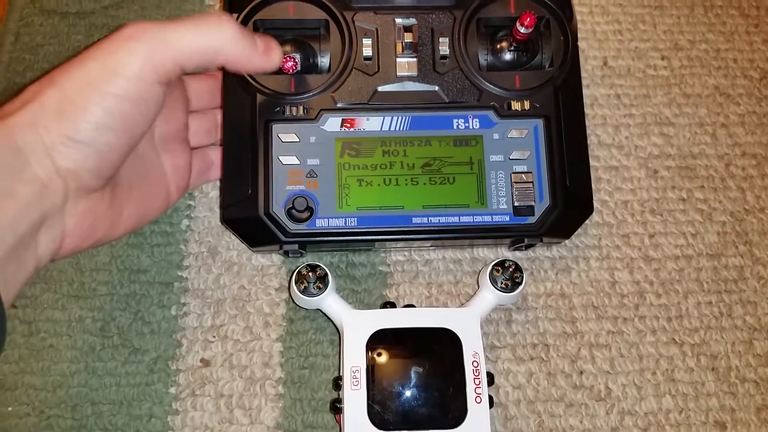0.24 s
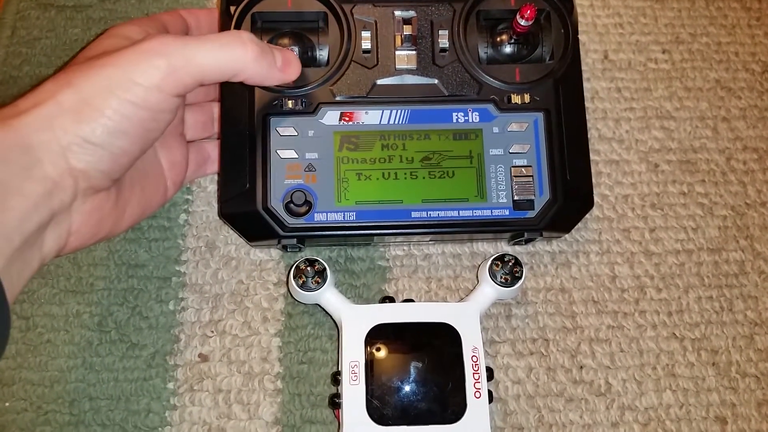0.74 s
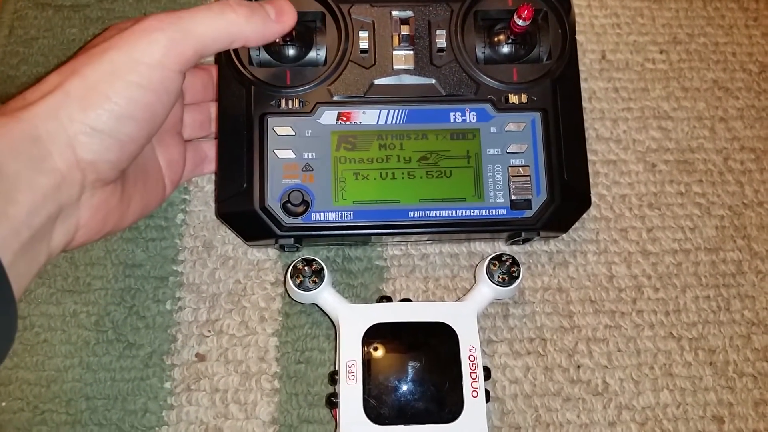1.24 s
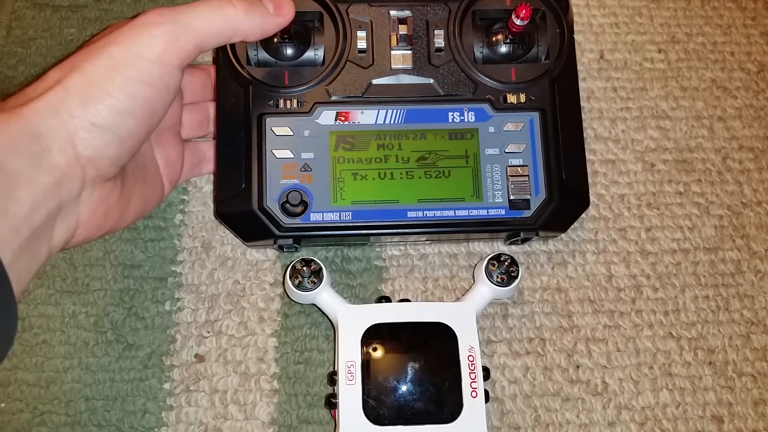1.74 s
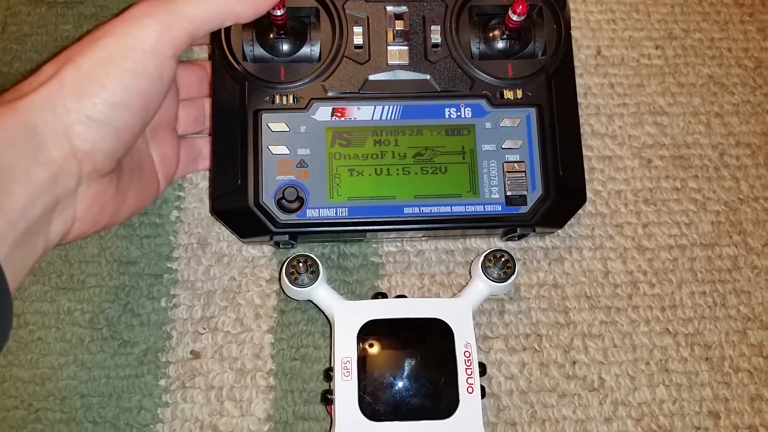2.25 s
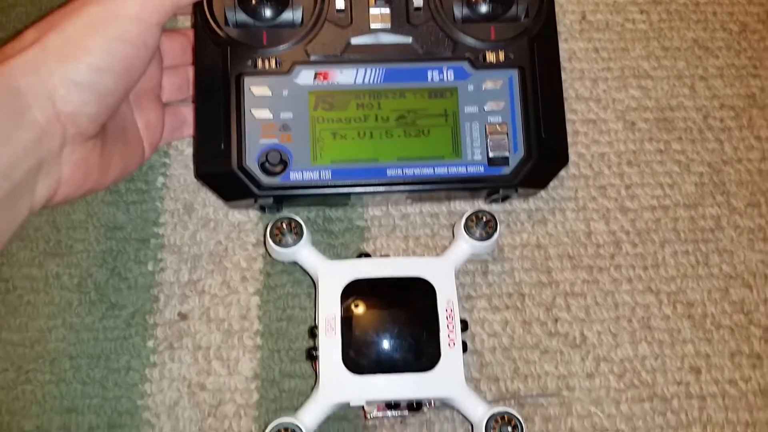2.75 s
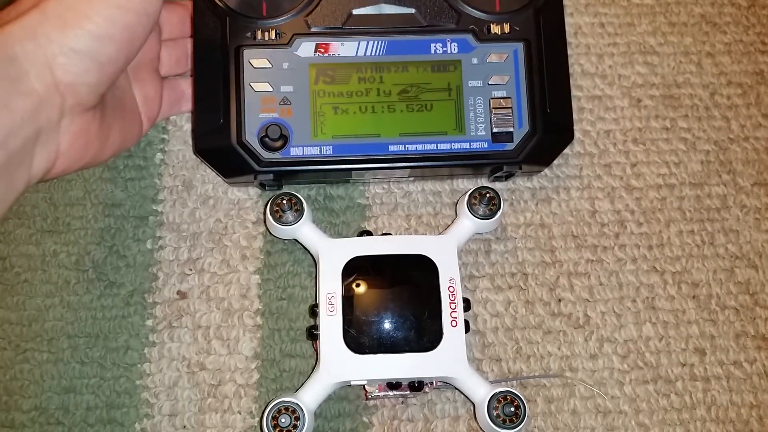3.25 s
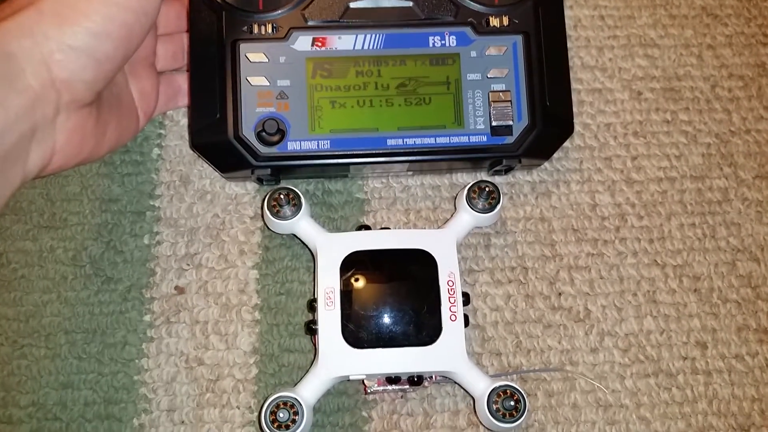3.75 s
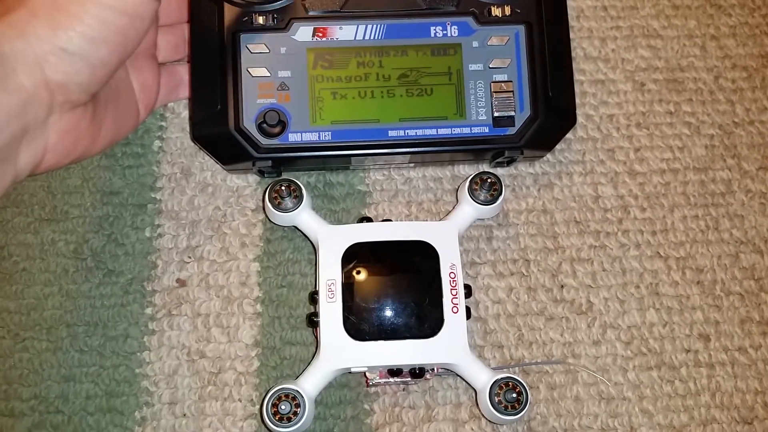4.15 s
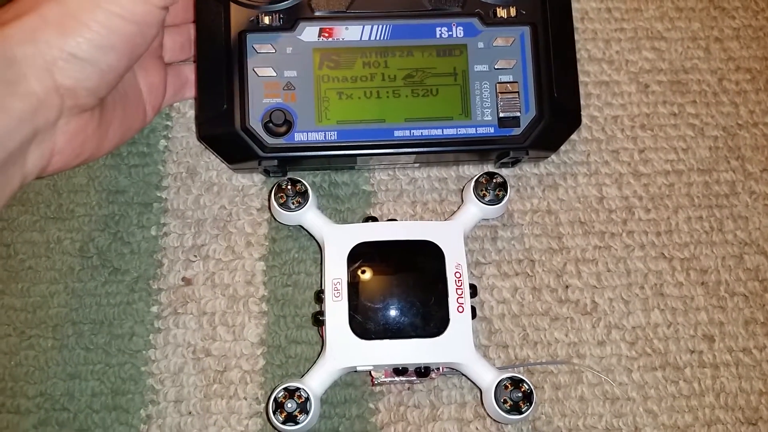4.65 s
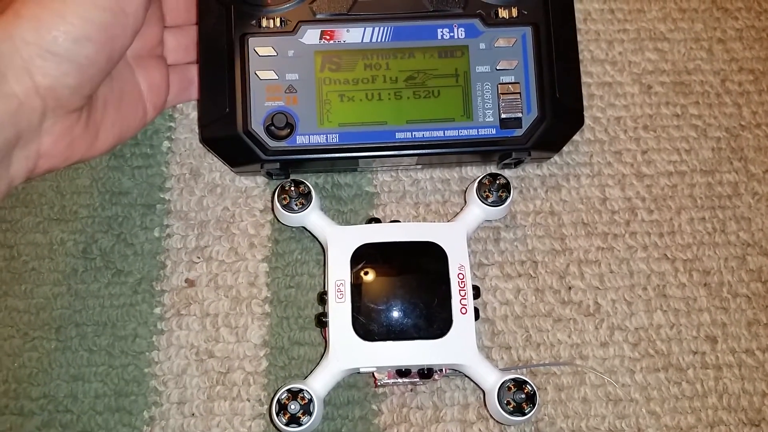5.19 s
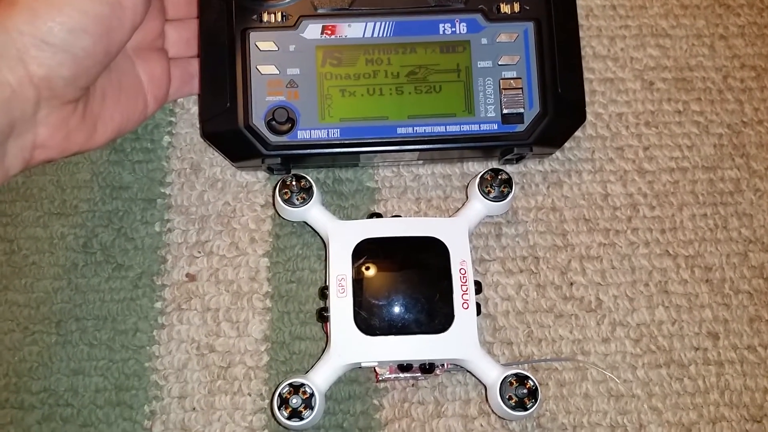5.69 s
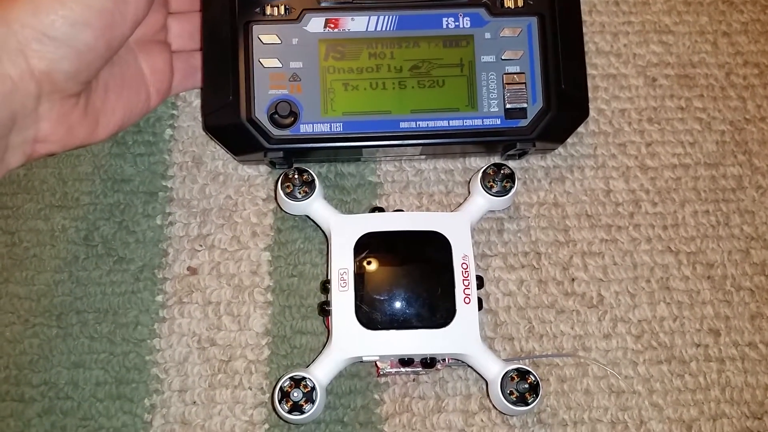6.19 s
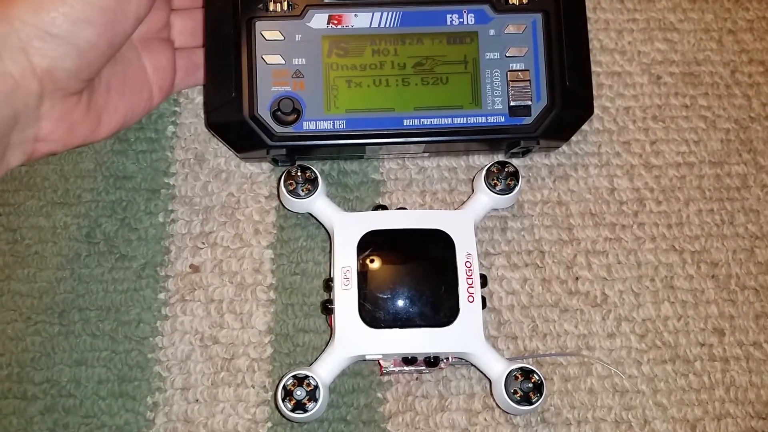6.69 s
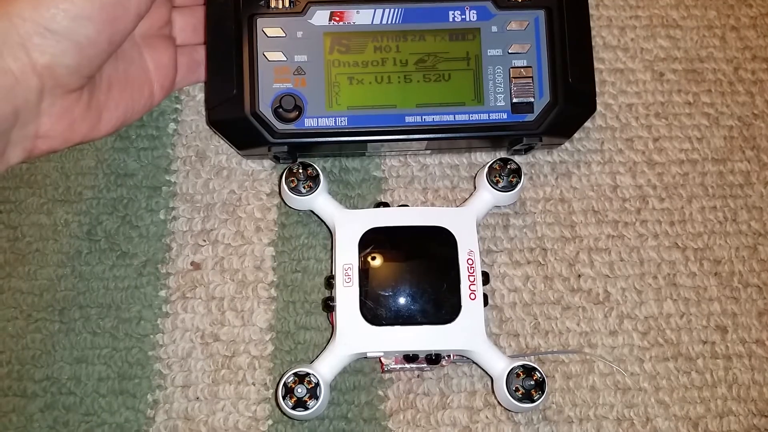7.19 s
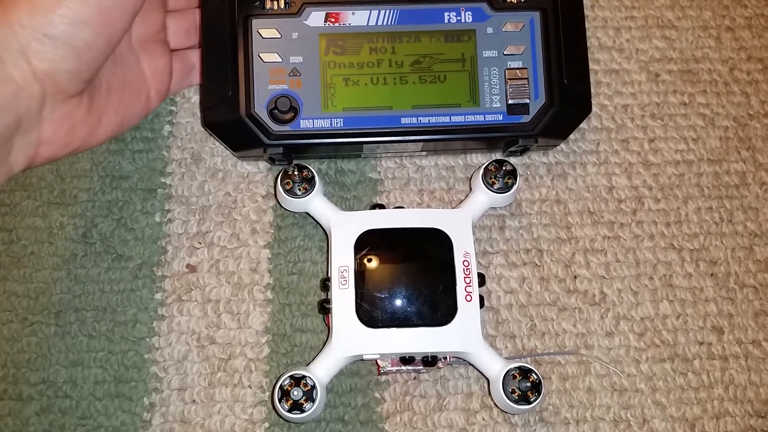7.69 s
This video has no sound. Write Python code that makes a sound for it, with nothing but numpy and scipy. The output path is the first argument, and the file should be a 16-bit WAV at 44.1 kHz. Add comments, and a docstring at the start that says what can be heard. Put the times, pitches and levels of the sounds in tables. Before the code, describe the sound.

Small bare motors rise into a bright, gritty high whine, run briefly and wind down with a snap, framed by plastic creaks and low room rumble.

```python
"""Four small brushless motors without propellers spin up, whine for about two seconds and coast to a stop on a carpet.
Their whine is sine lines locked to shaft speed and lifted by frame resonances; their bearings are filtered random
ticks, and their drives squeal in nearly fixed tones. A hand creaks a plastic case: noise cracks and decaying modes.
The room rumbles in filtered noise, and the left microphone port is shaded."""
import sys
import numpy as np
from scipy import signal
from scipy.fft import rfft, irfft, next_fast_len
from scipy.io import wavfile
from scipy.ndimage import uniform_filter1d

SR = 44100
rng = np.random.default_rng(int(sys.argv[2]) if len(sys.argv) > 2 else 0)


def put_to_file(sound):
    """Save the sound as 16-bit audio at rate SR, in the file named by the first command-line argument."""
    columns = np.atleast_2d(sound).T  # one column per channel
    safe = np.clip(columns, -1, 1)
    whole_steps = np.round(safe * 32767)
    wavfile.write(sys.argv[1], SR, whole_steps.astype(np.int16))


N = 349713
TIME = np.arange(N) / SR
START_S, CUT_S, STOP_S = 1.885, 3.728, 4.54  # power on, power cut, all at rest


def undb(db):
    """Decibel law: amplitude ratio of a level in dB."""
    return 10 ** (np.asarray(db) / 20)


def level(x, db):
    """Root-mean-square normalisation: scale a signal to a level in dB rms."""
    return x * undb(db) / np.sqrt(np.mean(x ** 2))


def curves(table):
    """Linear interpolation: each column of a table drawn out over the time in its first column."""
    times, *columns = np.transpose(table)
    return [np.interp(TIME, times, column) for column in columns]


def colour(x, points):
    """Linear filtering: weight the spectrum by points of (frequency [Hz], gain [dB]) on a log frequency axis."""
    size = next_fast_len(x.shape[-1] + 4096)
    hz, db = np.transpose(points)
    log_hz = np.log(np.fft.rfftfreq(size, 1 / SR) + 1)  # + 1 Hz avoids log(0)
    gain = undb(np.interp(log_hz, np.log(hz), db))
    return irfft(rfft(x, size) * gain, size)[..., :x.shape[-1]]


def walk(rate):
    """Smoothed random steps: a slow wander of rms 1, with rate new values per second."""
    hold = int(SR / rate)
    steps = np.repeat(rng.standard_normal(N // hold + 1), hold)
    return level(uniform_filter1d(steps, hold)[:N], 0)


def decay(t, t60_s):
    """Exponential decay: amplitude falls by 60 dB in t60_s."""
    return np.exp(-np.log(1000) * t / abs(t60_s))


def scatter(x, t60_s, db):
    """Diffuse reverberation: convolution with decaying noise, for sound arriving after many reflections."""
    t = TIME[:SR // 2]
    response = level(rng.standard_normal(len(t)) * decay(t, t60_s), db) / np.sqrt(len(t))
    return signal.fftconvolve(x, response)[:N]


def add(out, s, hit):
    """Superposition: a short sound joins the others at s seconds."""
    start = int(s * SR)
    out[start:start + len(hit)] += hit


def room():
    """Partly coherent noise: rumble largely shared by the ports, murmur mostly separate, hiss of the electronics."""
    # background level: (time [s], rumble before swell and port offset [dB], murmur relative to rumble [dB])
    room_levels = [(0.0, -67, -5.5), (1.4, -66, -10), (4.9, -63, -6.5), (6.0, -59, -13), (7.93, -58, -8.5)]
    # spectral shape of the rumble: (frequency [Hz], relative density [dB per Hz])
    rumble_shape = [(12, -46.5), (20, -12.5), (22, -17), (57, -2), (156, 2.5), (184, 2), (315, -22.5),
                    (362, -14), (400, -26), (520, -55), (880, -120)]
    # spectral shape of the murmur: (frequency [Hz], relative density [dB per Hz])
    murmur_shape = [(150, -25.5), (260, -2), (360, -8), (402, -11), (463, -10.5), (545, -18.5),
                    (1270, -29.5), (1860, -31), (3500, -47), (4550, -78.5), (7700, -120)]
    hiss_db = -90
    # the background swells while the motors turn
    swell_db, swell_from_s, swell_rise_s, swell_to_s, swell_fall_s = 8.5, 1.78, 0.15, 4.72, 0.4
    port_db = np.array([[-3.0], [3.0]])  # left, right

    rumble_db, murmur_db = curves(room_levels)
    rise = (TIME - swell_from_s) / swell_rise_s
    fall = (swell_to_s - TIME) / swell_fall_s
    rumble_db += swell_db * np.clip(np.minimum(rise, fall), 0, 1)
    noise = rng.standard_normal((7, N))
    shared = noise[0]
    rumble = level(colour(shared + 0.49 * noise[1:3], rumble_shape), 0)
    murmur = level(colour(0.34 * shared + noise[3:5], murmur_shape), 0)
    murmur = murmur * undb(murmur_db + 0.5 * walk(3))
    gain = undb(rumble_db + 1.3 * walk(3) + port_db)
    return gain * (rumble + murmur) + undb(hiss_db) * noise[5:]


def ring(modes, tilt_db, push_s, length=.4):
    """Modal decay: a short scraping push excites damped modes, each a little off its usual pitch and strength."""
    t = TIME[:int(length * SR)]
    chance = rng.standard_normal((len(modes), 3))
    out = np.zeros(len(t))
    for (hz, db, t60_s), (strength, detune, phase) in zip(modes, chance):
        gain = undb(db + tilt_db * np.log2(hz / 840) + 2.0 * strength)
        tone = np.sin(2 * np.pi * hz * (1 + 0.02 * detune) * t + 3 * phase)
        out += gain * tone * decay(t, t60_s)
    return np.clip(t / push_s, 0, 1) ** 2 * out


def knocks():
    """Impact excitation: plastic creaks and clicks as modes plus broadband cracks, with a snap as the motors slow."""
    # knocks of plastic: (time [s], level before mixing [dB], spectral tilt of the modes [dB per octave])
    plastic_knocks = [(0.064, -72, -7), (0.096, -45.5, 2), (0.112, -42, -1), (0.123, -44, -0.5),
                      (0.135, -41, 0.5), (0.152, -41.5, -1), (0.169, -52, 1), (0.915, -76, 3),
                      (0.94, -77, 3), (0.965, -76, 4.5), (5.030, -42, -1.5), (7.875, -67, -6)]
    # modes of the case: (nominal frequency [Hz], relative level [dB], decay time T60 [s])
    case_modes = [(369, 0.5, 0.016), (667, -7.5, 0.073), (828, 6.5, 0.034), (966, 0, 0.016),
                  (1208, -5, 0.033), (1645, 3, 0.02), (2020, 16.5, 0.0064)]
    # spectrum of the crack noise: (frequency [Hz], relative gain [dB])
    crack_shape = [(300, -28), (2500, 3), (3600, -4), (4300, -15), (5800, -6.5), (7600, -19), (9500, -5),
                   (13000, -13), (16000, -10)]
    # modes of the sharp snap: (nominal frequency [Hz], nominal level before mixing [dB], decay time T60 [s])
    snap_modes = [(379, -28.5, 0.012), (666, -46, .03), (1000, -30.5, .015), (8000, -41.5, 0.0075),
                  (10360, -49, .01), (13200, -37.5, .012), (15000, -35.5, .012)]
    # a spring that rings on: (nominal frequency [Hz], nominal level before mixing [dB], decay time T60 [s])
    twang_modes = [(1405, -58, 0.33)]
    crack_db, crack_t60_s = -31, 0.088  # noise before its decay, relative to the knock at zero tilt
    snap_s, twang_s = 4.228, 0.15

    out, t = np.zeros(N + SR), TIME[:SR // 5]
    for s, db, tilt_db in plastic_knocks:
        hit = ring(case_modes, tilt_db, 0.0035)
        add(out, s, undb(db) * hit / np.abs(hit).max())
        # brighter knocks crack louder
        crack = level(colour(rng.standard_normal(len(t)), crack_shape), crack_db + 3.3 * tilt_db)
        add(out, s, undb(db) * crack * decay(t, crack_t60_s))
    add(out, snap_s, ring(snap_modes, 0, 0.00071))
    add(out, twang_s, ring(twang_modes, 0, 0.051, .6))
    return out[:N]


def coasting():
    """Rotational damping: share of speed left after the power cut, drag first and dry friction last."""
    drag_s, friction = .45, .2  # drag time constant; dry friction as a share of full speed
    left_over = (1 + friction) * np.exp(-np.maximum(TIME - CUT_S, 0) / drag_s) - friction
    return np.clip(left_over, 0, 1)


def speed(motor):
    """Rotor kinematics: a ramp rounds off into the running speed, then coasts to rest; 1 is full speed."""
    # spin-up by motor name: (start [s], time to full speed [s], bend of the ramp [exponent], knee [exponent])
    spin_up = {"quick": (1.885, .445, 1, 14), "steady": (1.885, .53, .77, 16), "slow": (1.885, .455, 1, 4),
               "late": (2.2, .61, 1, 30)}
    sag, sag_ends_s, sag_lift_s = .013, 2.82, .05  # speeds stay slightly low until the late motor is up

    start, rise, bend, knee = spin_up[motor]
    ramp = (np.maximum(TIME - start, 0) / rise) ** bend
    share = ramp / (1 + ramp ** knee) ** (1 / knee)
    share = share * (1 - sag * (1 - np.tanh((TIME - sag_ends_s) / sag_lift_s)) / 2)
    full_speed = share[int(3.5 * SR)]
    return np.abs(uniform_filter1d(share * coasting(), 600)) / full_speed


def bearings(share, points, ticks=14000, flicker_db=0.67):
    """Shot noise: balls tick on the races at a rate set by speed, a dense rush that grows grainy near rest."""
    chance = (ticks * share + 2500) / SR  # chance of a tick in each sample
    hits = (rng.random(N) < chance) * rng.standard_normal(N)
    return level(colour(hits / np.sqrt(chance), points), 0) * undb(flicker_db * walk(12))


def rush():
    """Spectral shaping of shot noise: rattle and fizz of the bearings, and the boom of the frame."""
    # bearing noise before mixing: (time [s], rattle level [dB], frame boom level [dB])
    bearing_levels = [(1.885, -79.5, -98), (1.91, -66.5, -82), (1.96, -51.5, -52.5), (2.02, -44, -43),
                      (2.12, -36, -38.5), (2.21, -29.5, -34.5), (2.28, -27, -41.5), (3.73, -27.5, -43.5),
                      (3.96, -25.5, -34.5), (4.1, -34.5, -34), (4.24, -46.5, -36.5), (4.42, -76.5, -55),
                      (4.5, -90, -87), (4.75, -104, -86)]
    # spectral shape of the rattle: (frequency [Hz], relative density [dB per Hz])
    rattle_shape = [(2000, -41), (3400, -11.5), (3570, -24.5), (3800, -22.5), (4070, -17.5), (4130, -35.5),
                    (4330, -32.5), (4500, -14.5), (5270, -7.5), (5700, -1.5), (7040, -8), (7990, -13),
                    (9120, 1.5), (9920, 2), (12000, -13.5), (15600, -35.5), (22000, -120)]
    # spectral shape of the boom: (frequency [Hz], relative density [dB per Hz])
    boom_shape = [(260, -52.5), (450, -31.5), (599, -33), (1060, -7), (1230, -13.5), (1570, 1),
                  (1730, -3.5), (1850, 3.5), (2050, -9), (2300, -8.5), (2600, -3), (2840, -14.5),
                  (3740, -18), (4000, -29), (4400, -21), (5720, -48.5), (9680, -120)]
    # spectral shape of the fizz: (frequency [Hz], relative density [dB per Hz])
    fizz_shape = [(6760, -35.5), (11500, 2.5), (12100, -6), (15100, -5), (16000, -17.5)]
    fizz_db, fizz_fade = -1.5, 0.82  # relative to the rattle; power of the coasting speed by which it fades

    rattle_db, boom_db = curves(bearing_levels)
    share = speed("steady")
    rattle = bearings(share, rattle_shape)
    fizz = undb(fizz_db) * coasting() ** fizz_fade * bearings(share, fizz_shape)
    boom = undb(boom_db) * bearings(share, boom_shape)
    end_s = bearing_levels[-1][0]
    running = np.clip(np.minimum(TIME - START_S, end_s - TIME) / 0.018, 0, 1)
    return running * (undb(rattle_db) * (rattle + fizz) + boom)


def squeal():
    """Electromagnetic excitation: the windings sound while the drives switch at a nearly fixed rate."""
    # switching tones before mixing: (start [s], end [s], frequency [Hz], level at start [dB], level at end [dB])
    switching_tones = [(1.89, 2.03, 7596, -62, -35.5), (1.892, 2.02, 15370, -58, -37),
                       (2.01, 2.32, 14850, -40, -33.5), (2.32, 3.75, 14735, -48.5, -53),
                       (3.765, 3.785, 7586, -39.5, -41)]
    out = np.zeros(N)
    for t0, t1, hz, db0, db1 in switching_tones:
        gate = np.clip(np.minimum(TIME - t0, t1 - TIME) / 0.0039, 0, 1)
        phase = 2 * np.pi * hz * np.cumsum(1 + 0.00063 * walk(60)) / SR
        gain = undb(np.interp(TIME, [t0, t1], [db0, db1]) + 4.9 * walk(40))
        out += np.sqrt(2) * gate * gain * np.sin(phase)
    return out


def frame_db(hz):
    """Forced resonance: lift of a line that lies on a resonance of the plastic frame."""
    # resonances of the frame: (frequency [Hz], half-power width [Hz], peak power over the unlifted level [dB])
    frame_modes = [(1770, 570, 29.5), (1863, 119, 12.5), (2600, 990, 17.5), (6060, 760, 20.5),
                   (9400, 230, 12)]
    lift = sum(undb(2 * db) / (1 + (2 * (hz - f) / width) ** 2) for f, width, db in frame_modes)
    return 10 * np.log10(1 + lift)


def whine(share, lines, waver=.0006, flutter_db=2.2, fade=4.5, coast_fade=4.2, ragged=2.2):
    """Order lines: tones tied to one shaft light up on frame resonances and grow faint and ragged at low speed."""
    on = slice(int(START_S * SR), int(STOP_S * SR))
    turn = 2 * np.pi * np.cumsum((share * (1 + waver * walk(30)))[on]) / SR  # phase of a 1 Hz line
    out, flutter = np.zeros(N), walk(25)
    depth_db = flutter_db * (1 + ragged * (1 - share))
    for hz, db in lines:
        # lift relative to full speed, renewed every 32 samples
        lift_db = frame_db(hz * share[on][::32]) - frame_db(hz)
        lift = np.repeat(undb(lift_db), 32)[:len(turn)]
        wobble = undb((depth_db * np.roll(flutter, rng.integers(N)))[on])
        tone = np.sin(hz * turn + rng.uniform(0, 2 * np.pi))
        out[on] += np.sqrt(2) * undb(db) * lift * wobble * tone
    return out * share ** np.where(TIME < CUT_S, fade, coast_fade)


def motors():
    """Rotating-source spectra: whine and cogging lines follow the four shafts, and the drives add their squeal."""
    # lines of the quick motor: (frequency at full speed [Hz], level before mixing [dB rms])
    quick_lines = [(394, -62.5), (1244, -50.5), (1848, -54.5), (1884, -58), (5899, -43.5), (7866, -56),
                   (8325, -54), (8924, -46), (9448, -41), (11289, -44), (12312, -47.5), (13030, -44.5)]
    # lines of the steady motor: (frequency at full speed [Hz], level before mixing [dB rms])
    steady_lines = [(1185, -59.5), (2472, -55), (2574, -55), (2958, -61.5), (4650, -59), (5512, -44),
                    (6245, -43.5), (6334, -49), (7407, -49), (8044, -56), (8565, -51), (8747, -51),
                    (9092, -50), (9593, -47), (12261, -45)]
    # lines of the slow motor: (frequency at full speed [Hz], level before mixing [dB rms])
    slow_lines = [(462, -76), (850, -69), (945, -66.5), (1044, -56.5), (1705, -57), (2835, -62),
                  (6426, -55), (9936, -43), (10218, -41.5), (10292, -41), (10420, -45.5)]
    # lines of the motor that starts late: (frequency at full speed [Hz], level before mixing [dB rms])
    late_lines = [(3776, -57.5), (3934, -49.5), (5619, -45), (5667, -44)]
    # magnets passing the stator teeth, levels before fades and mixing:
    # (multiple of cog_hz [-], level driven [dB rms], level coasting [dB rms])
    cogging = [(1, -59, -60), (1.5, -66, -48), (2, -50, -47), (3, -51.5, -60), (4, -58, -42), (6, -54, -62),
               (9.5, -66, -48.5)]
    cog_hz = 1683  # at full speed
    whine_db = 1.5
    lock_s, lock_rise_s = 2.02, .1  # the tones set in once the drives have caught the rotors

    steady = speed("steady")
    lines = whine(speed("quick"), quick_lines)
    lines += whine(steady, steady_lines)
    lines += whine(speed("slow"), slow_lines)
    lines += whine(speed("late"), late_lines, fade=14, coast_fade=6)
    driven_lines = [(k * cog_hz, db) for k, db, _ in cogging]
    free_lines = [(k * cog_hz, db) for k, _, db in cogging]
    driven = whine(steady, driven_lines, waver=.001, flutter_db=2.2, fade=1.6)
    free = whine(steady, free_lines, waver=.002, flutter_db=2.5, coast_fade=1.9, ragged=1)
    cut = np.clip((TIME - CUT_S) / .03, 0, 1)  # driven cogging gives way to coasting
    locked = np.clip((TIME - lock_s) / lock_rise_s, 0, 1)
    return locked * (undb(whine_db) * lines + (1 - cut) * driven + cut * free) + squeal()


def scene():
    """Direct and diffuse fields: motors and hand reach each port directly and by reflection, over the room noise."""
    # shading of the left port: (frequency [Hz], gain [dB] before an overall make-up gain)
    shade = [(60, -5.5), (110, -1.5), (200, -9), (380, -16), (700, -13), (1290, -20.5), (2380, -24),
             (4400, -20.5), (8120, -41), (15000, -13.5)]
    tail_t60_s, tail_db = 0.55, -6.5
    dull = [(100, -4.0), (1500, 10.0), (4000, 2.0), (16000, -6.5)]  # colour of the reflections

    tones, hand = motors(), knocks()
    drone = tones + rush()
    right = undb(7.0) * drone + colour(scatter(drone, tail_t60_s, -15.5), dull)
    # the shaded port hears the near bearings in the bass; its treble is the rush of the far ones, off the walls
    direct = colour(drone, [(100, 1.0), (1500, -4.5), (4000, -7), (16000, -16.5)])
    reflected = scatter(rush() + undb(-9.5) * tones, 0.47, 0)
    far = colour(reflected, [(100, -7.0), (1500, -3.5), (4000, -2.5), (16000, 0.0)])
    left = undb(10.0) * colour(direct + far, shade)
    right += undb(8) * hand + colour(scatter(hand, tail_t60_s, tail_db), dull)
    left += undb(-15.0) * hand + colour(scatter(hand, tail_t60_s, tail_db - 11), dull)
    return np.array([left, right]) + room()


def record(dry):
    """Band limiting: the phone cuts the top with two passes of a steep elliptic low-pass."""
    top_hz = 15800
    sos = signal.ellip(12, .1, 60, top_hz, fs=SR, output="sos")
    return signal.sosfilt(sos, signal.sosfilt(sos, dry))


dry = scene()
out = record(dry)
put_to_file(out)
```